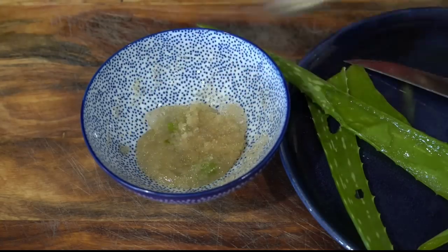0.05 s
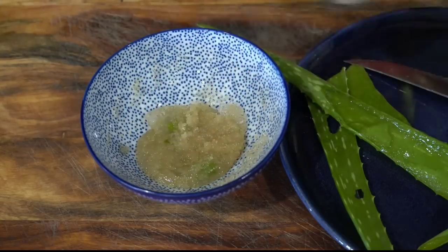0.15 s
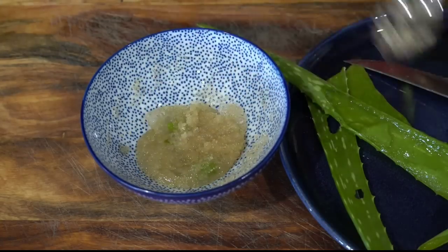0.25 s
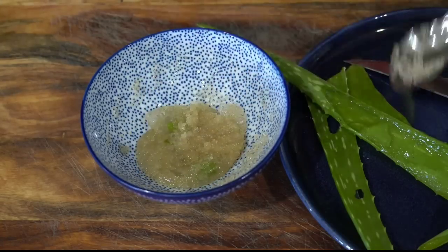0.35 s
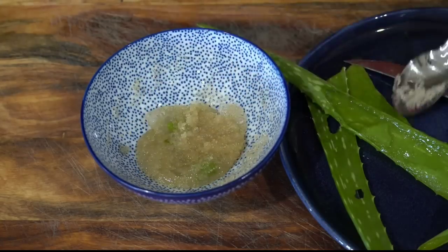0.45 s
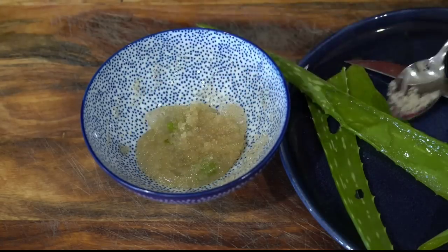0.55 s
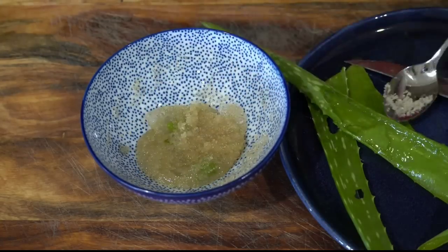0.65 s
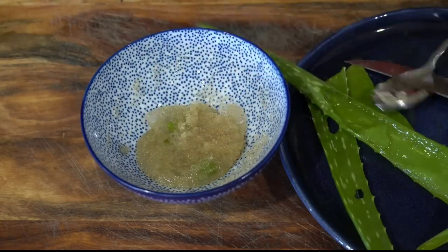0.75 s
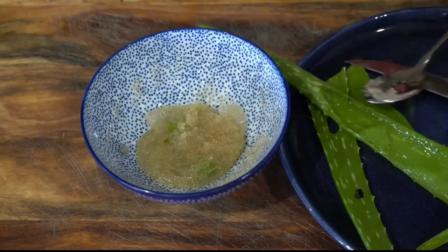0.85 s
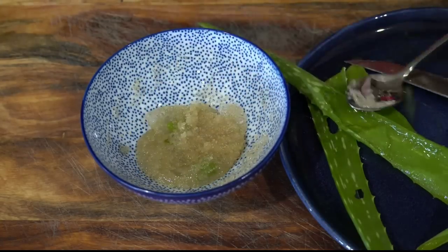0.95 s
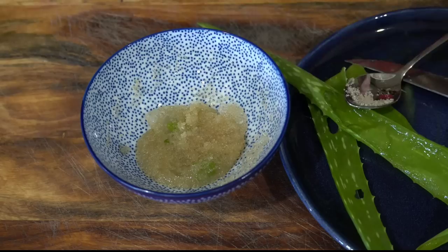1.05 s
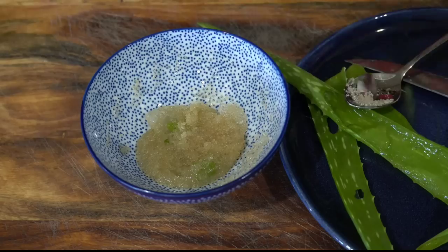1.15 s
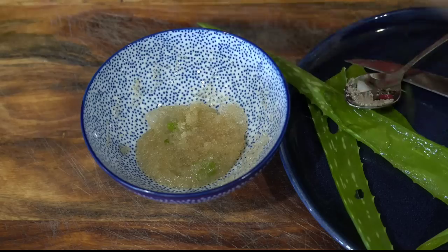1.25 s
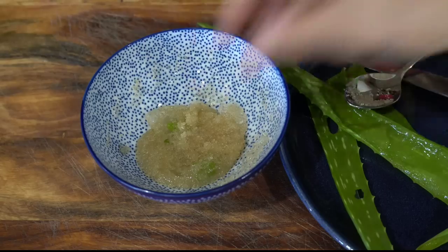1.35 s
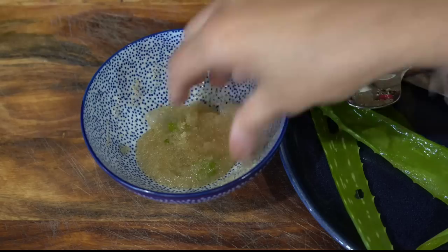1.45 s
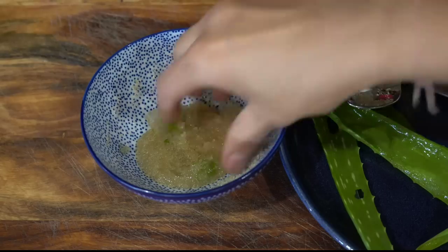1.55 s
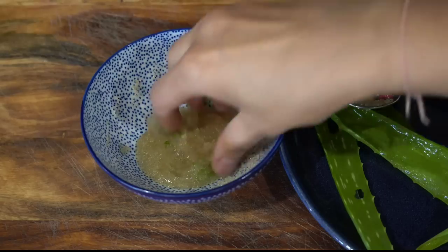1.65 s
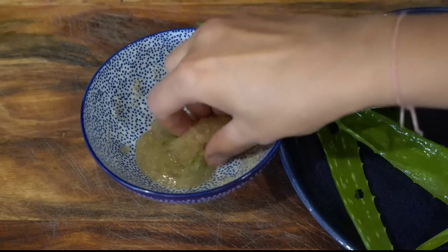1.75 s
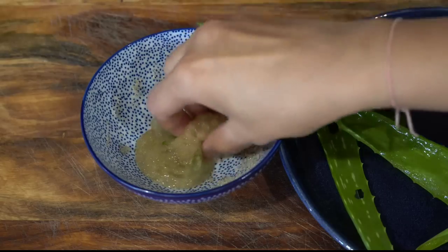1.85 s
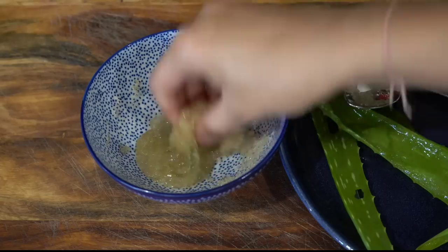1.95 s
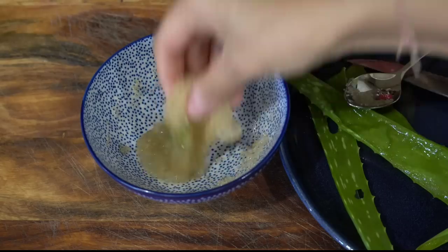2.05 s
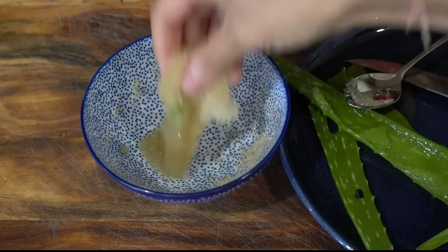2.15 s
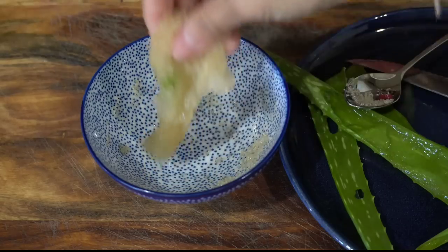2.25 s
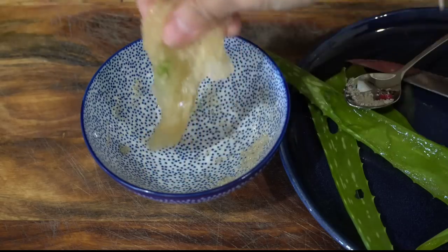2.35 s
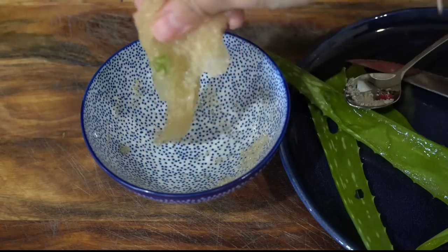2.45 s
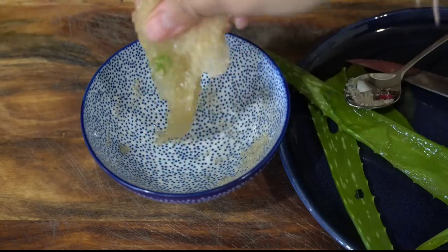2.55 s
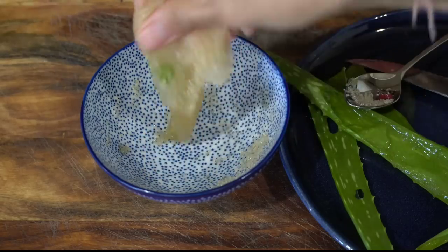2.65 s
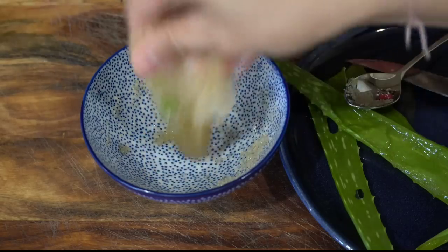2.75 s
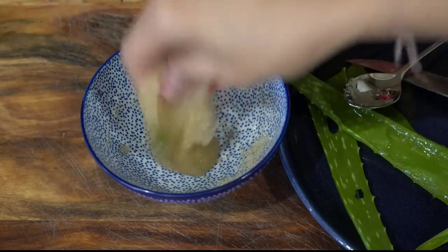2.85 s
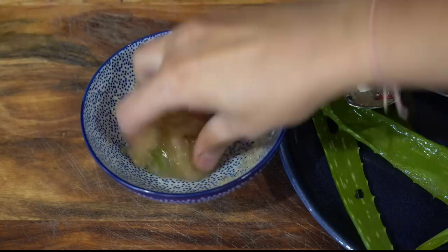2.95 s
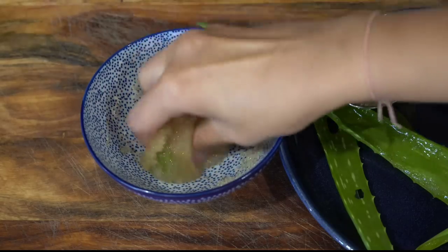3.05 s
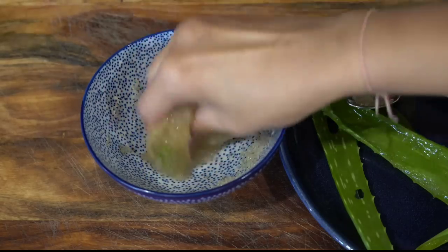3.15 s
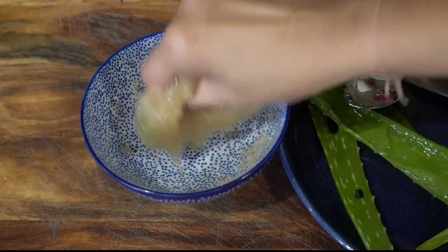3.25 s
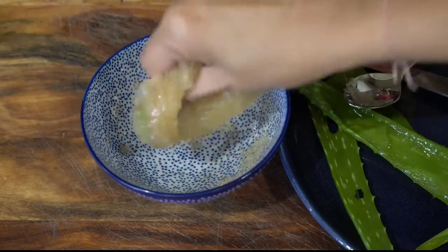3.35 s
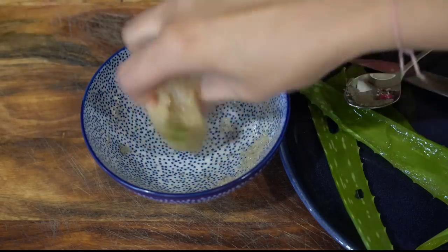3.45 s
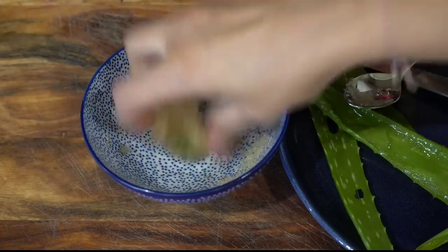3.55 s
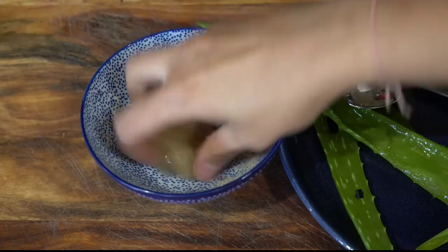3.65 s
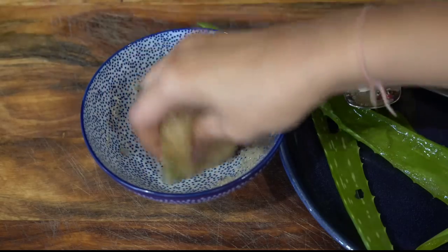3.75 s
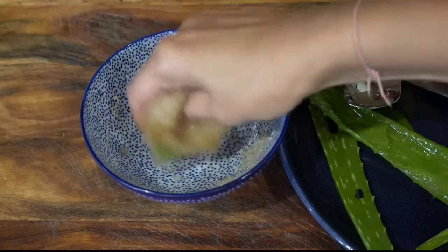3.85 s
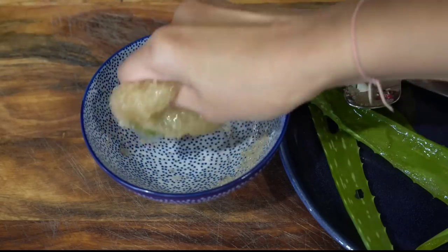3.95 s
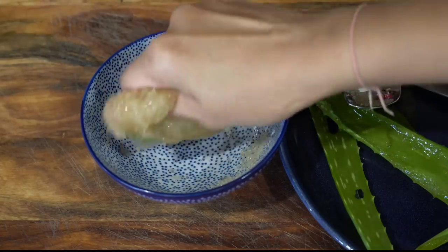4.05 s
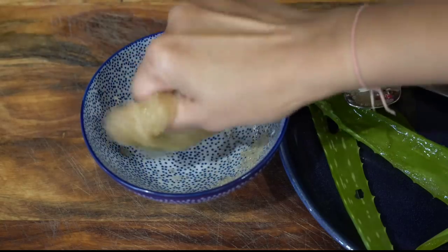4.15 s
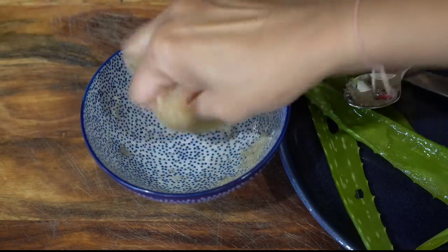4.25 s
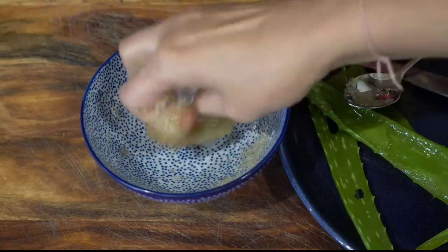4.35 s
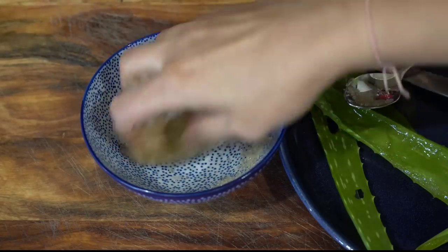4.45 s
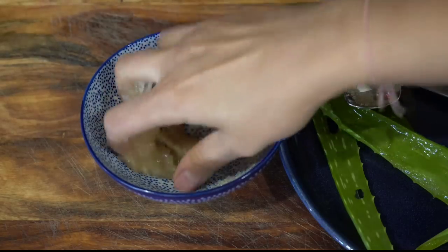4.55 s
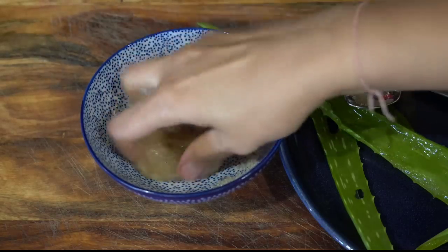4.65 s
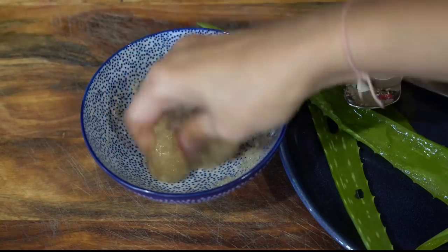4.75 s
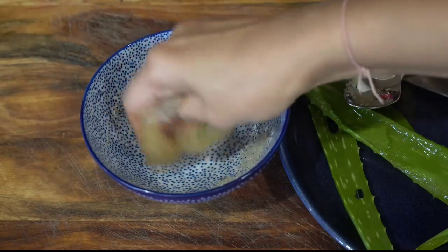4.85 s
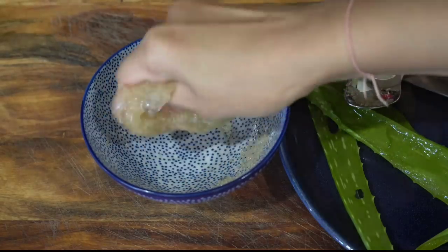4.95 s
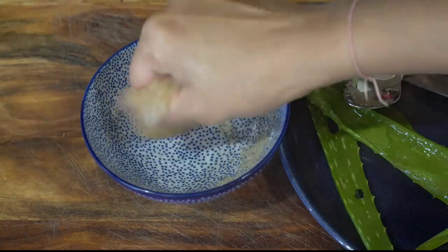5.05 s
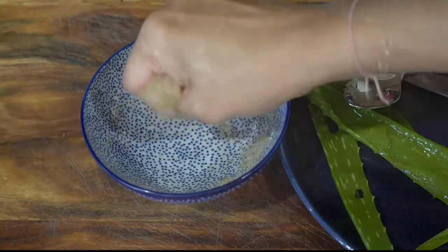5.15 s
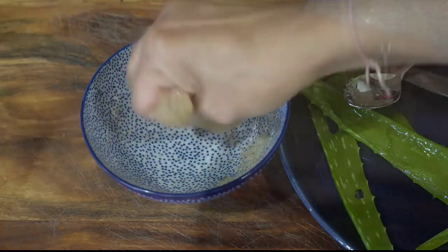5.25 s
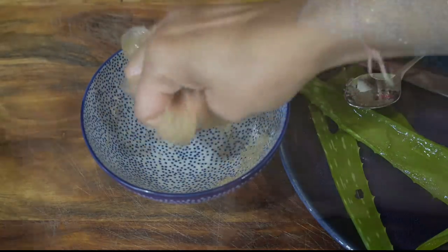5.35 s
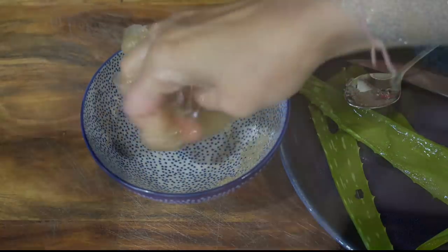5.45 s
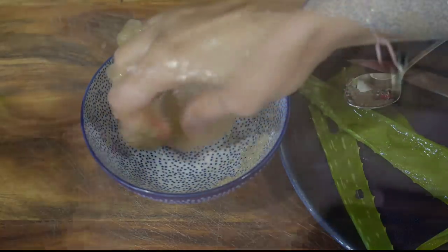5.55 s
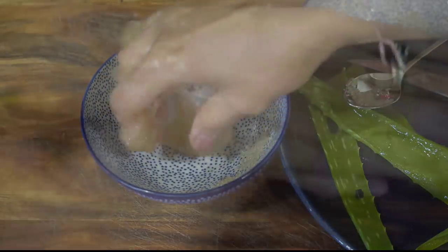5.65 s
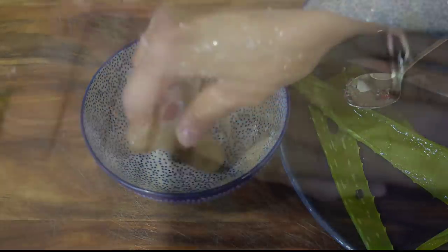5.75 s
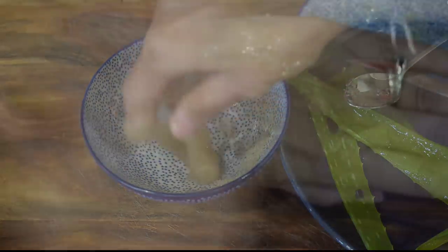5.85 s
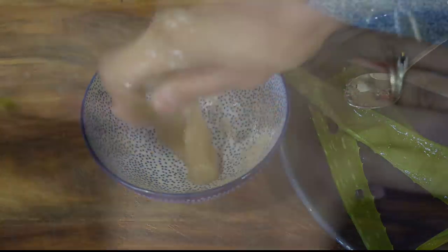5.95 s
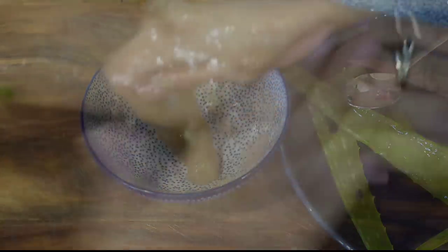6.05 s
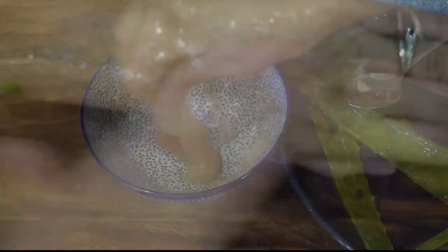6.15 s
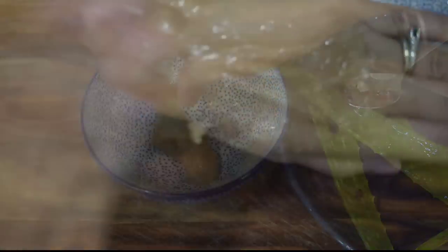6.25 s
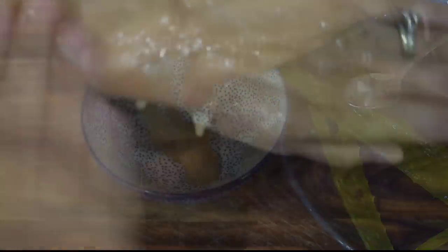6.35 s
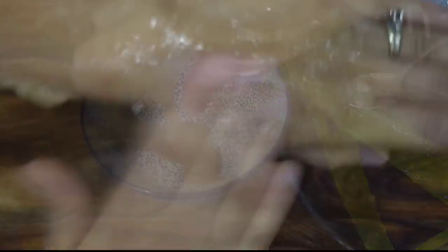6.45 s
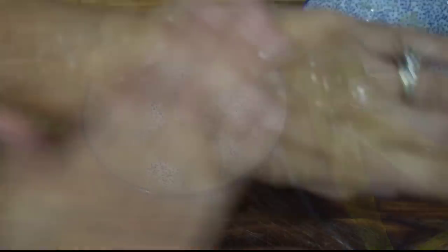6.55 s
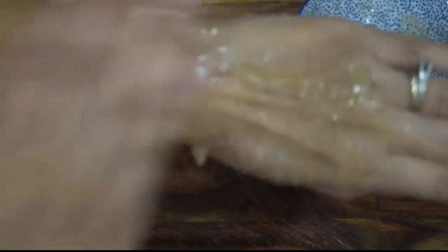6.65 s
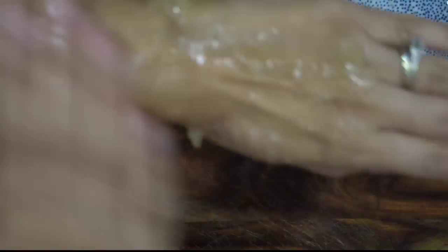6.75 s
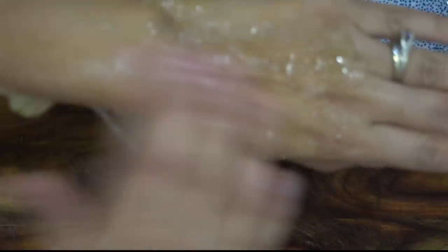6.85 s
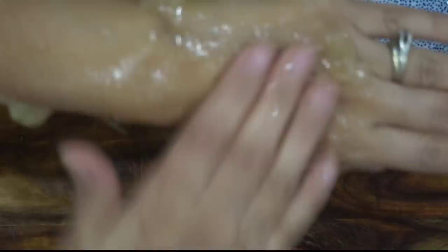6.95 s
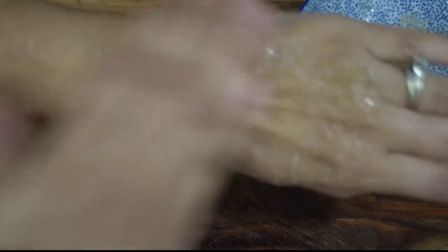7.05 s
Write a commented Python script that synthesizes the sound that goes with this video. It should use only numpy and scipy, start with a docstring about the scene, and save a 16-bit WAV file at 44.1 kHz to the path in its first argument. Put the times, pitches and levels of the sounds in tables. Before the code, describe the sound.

A faint low drone hums in a hard-walled kitchen. At about 0.5 seconds a steel spoon meets a plate slightly to the right with a dull knock and a bright clink, taps lightly, then chatters to rest around 1 second. From 1.7 seconds a hand kneads wet sugar paste in a ceramic bowl, close by: quiet, irregular squeezes squelch, crunch and fizz, dotted with small ticks and sharp sticky smacks. The bowl knocks on its wooden board at 3.6 seconds and more softly around 4.5. The sharpest smacks come at 4, 4.9 and 5.4 seconds. Near 5.8 seconds the drone and hiss abruptly step up, a short knock follows, and the hand rubs the paste on skin in gritty, fizzy strokes with a few wet pops until the end, just after 7 seconds. A short room echo follows the clinks, knocks and smacks.

```python
"""A low drone hums in a hard-walled kitchen. Half a second in, a steel spoon is laid on a plate to the
right with a dull knock, rings, and chatters to rest. From 1.7 s a hand kneads wet sugar paste in a bowl:
slipping grains squelch, crunch and fizz, sticky films smack, and the bowl knocks and rocks on its board.
Near 5.8 s the drone and hiss step up, and the hand rubs the paste on skin in fizzy strokes.
The walls answer the spoon, the knocks and the smacks."""
import sys
import numpy as np
from scipy import signal
from scipy.fft import rfft, irfft, next_fast_len
from scipy.io import wavfile
from scipy.ndimage import uniform_filter1d, map_coordinates

SR = 44100
rng = np.random.default_rng(int(sys.argv[2]) if len(sys.argv) > 2 else 0)


def inscribe(sig):
    """Save sig as 16-bit PCM at rate SR to the path in sys.argv[1].

    A 1-D sig is mono; a 2-D sig holds one channel per row.
    Samples are clipped to [-1, 1] before scaling.
    """
    pcm = np.round(np.clip(np.atleast_2d(sig).T, -1, 1) * 32767)
    wavfile.write(sys.argv[1], SR, pcm.astype(np.int16))


N = 313551

# ringing modes of spoon and plate: pitch_hz
STEEL_MODES_HZ = [1005, 1206, 1640, 2385, 2557, 2772, 3015, 3833, 3992, 4495, 4887, 5211, 5350, 5782, 6503,
                  7327, 7655, 8726, 9640, 10200, 10800, 11650, 13070, 13750]
# sticky paste letting go: start_s, level_db, pan_db (left minus right), pop_hz, low_pop_hz, low_pop_db
LOUD_SMACKS = [(2.0325, -38.5, 2, 14200, 2240, -21), (2.001, -39, -1, 14800, 1560, -16),
               (2.1024, -45, -9, 9800, 2090, -13), (2.074, -37, -4, 11500, 1800, -23),
               (2.339, -37.5, -3, 9780, 2990, -3), (2.453, -31, -4, 14200, 3700, -4),
               (2.43, -36, -2, 12000, 3010, -12), (2.484, -30.5, -11, 12800, 4000, -14),
               (2.6087, -42, -2, 4730, 3720, 3), (2.6875, -30, -6, 9700, 2220, -20),
               (3.0757, -34.5, 4, 5100, 2270, -16), (3.4354, -42, -4, 5200, 2330, 4),
               (3.602, -37.5, -1, 8000, 2230, 21), (3.803, -30.5, 0, 4460, 2020, 1),
               (3.8639, -42, -6, 4840, 2200, 6), (3.9121, -37.5, 1, 9420, 2300, 8),
               (3.9408, -35.5, -2, 8900, 2660, -6), (4.002, -23, -3, 5530, 3350, -14),
               (4.7994, -36, 0, 4600, 1520, 6), (4.8908, -17.5, 2.5, 5540, 3780, 1),
               (4.978, -34.5, .5, 6060, 2180, 1.5), (5.1006, -40, 0, 14300, 1590, -2),
               (5.1254, -33.5, 0, 11400, 1480, -5), (5.2392, -38, -3, 5800, 2180, 10.5),
               (5.378, -25.5, 2.5, 5930, 2440, 0.5), (5.9184, -31, 1, 4310, 2090, 10),
               (6.223, -40, -6, 11200, 1540, -10), (6.3441, -31, -1, 8950, 2540, -11),
               (6.648, -36, 0, 4100, 2720, 6.5), (7.026, -38.5, -7, 5260, 3000, -4)]


def amp(db):
    return 10 ** (np.asarray(db) / 20)


def unit(x):
    return x / np.sqrt(np.mean(x ** 2) + 1e-20)


def along(points, hz):
    """Reads a curve of (Hz, value) points on a log frequency axis."""
    freqs, values = np.transpose(points)
    return np.interp(np.log(hz + 1), np.log(freqs + 1), values)


def filtered(x, response):
    """Shapes x with a complex frequency response."""
    size = next_fast_len(x.shape[-1] + 2048)
    return irfft(rfft(x, size) * response(np.fft.rfftfreq(size, 1 / SR)), size)[..., :x.shape[-1]]


def resonance(f, hz, width):
    """Response of one resonator centred on hz."""
    return 1j * f * width / (hz * hz - f * f + 1j * f * width)


def spectrum(points):
    """Turns (Hz, dB) points into a frequency response."""
    return lambda hz: amp(along(points, hz))


def rush(colour, likeness, patchy_db, grain=1):
    """Stereo noise of rms 1, flickering in brief, wide-band patches and roughened by a grain envelope."""
    bins = signal.stft(rng.standard_normal((2, N)), nperseg=256)[2]
    patches = uniform_filter1d(rng.standard_normal(bins.shape[1:]), size=12, axis=0)
    patches = uniform_filter1d(patches, size=5, axis=1)
    pair = grain * signal.istft(bins * amp(patchy_db * unit(patches)), nperseg=256)[1][:, :N]
    spread = lambda hz: np.arccos(np.clip(along(likeness, hz), -1, 1)) / 2
    mid, side = filtered(pair, lambda hz: colour(hz) * [np.cos(spread(hz)), np.sin(spread(hz))])
    return unit(np.array([mid + side, mid - side]))


def kitchen_reverb(x):
    """The walls' answer: the treble dies sooner and spreads wider than the bass."""
    # decay of the room: frequency_hz, t60_s
    decay = [(300, 0.77), (2000, 0.49), (6000, 0.51), (15000, 0.32)]
    hz, t = np.fft.rfftfreq(256, 1 / SR), np.arange(160) * 128 / SR
    shape = (2, len(hz), len(t))
    mid, side = rng.standard_normal(shape) + 1j * rng.standard_normal(shape)
    width = np.clip(hz / 2500, .2, 1)[:, None]
    echoes = np.array([mid + width * side, mid - width * side]) / np.sqrt(1 + width ** 2)
    tail = signal.istft(echoes * amp(-60 * t / along(decay, hz)[:, None]), SR, nperseg=256)[1]
    tail *= np.minimum(np.arange(tail.shape[1]) / (0.004 * SR), 1)  # echoes build up
    return signal.fftconvolve(x[None], tail / np.linalg.norm(tail[0]), axes=1)


def place(out, start_s, sound, pan_db, wet_db, low_cut_hz=194):
    """Pans one sound into the mix with its own room tail; a low cut thins the bass of each sound."""
    sound = filtered(sound, lambda f: (1j * f / (1j * f + low_cut_hz)) ** 2)
    stereo = amp(wet_db) * kitchen_reverb(sound) * amp([[pan_db / 4], [-pan_db / 4]])
    stereo[:, :len(sound)] += sound * amp([[pan_db / 2], [-pan_db / 2]])
    out[:, round(start_s * SR):][:, :stereo.shape[1]] += stereo


def room_tone(step_s=5.845, early_hiss_db=-71.5, late_hiss_db=-59.5):
    """A broad low drone and a faint hiss, both abruptly fuller from 5.85 s on."""
    # swell of the drone: time_s, level_db
    swell = [(0, -62.5), (.45, -63.5), (1.1, -69.5), (1.3, -69), (1.6, -63.5), (2.2, -68.5), (3, -65.5),
             (3.4, -67), (3.75, -64.5), (4.4, -65), (5.3, -63.5), (5.84, -70.5), (5.85, -55.5),
             (6.1, -57.5), (7.11, -57.5)]
    # colours of the early drone, the late drone and the hiss: frequency_hz, density_db
    early_colour = [(15, -80), (25, -80), (92, -17.5), (151, -21), (391, -1), (695, -6), (849, -5.5),
                    (1040, -3.5), (1180, -9.5), (1410, -7.5), (1840, -14), (2250, -7.5), (2690, -13),
                    (3140, -23), (5000, -49), (6500, -74), (11000, -120)]
    late_colour = [(15, -71), (25, -59), (92, -16), (171, -20.5), (253, -6.5), (391, -1), (434, -2.5),
                   (774, -5), (1630, -12.5), (3500, -18), (4550, -57), (7700, -120)]
    hiss_colour = [(1760, -17), (3000, -3), (3830, 0), (5420, -3.5), (8750, -5.5), (15800, -8.5)]
    # stereo image of the room: frequency_hz, left_right_correlation
    likeness = [(60, 0.65), (240, 0.99), (950, 0.39), (3770, 0.044), (15000, 0.1)]
    t = np.arange(N) / SR
    early = rush(spectrum(early_colour), likeness, patchy_db=0.43)
    late = rush(spectrum(late_colour), likeness, patchy_db=0.04)
    hiss = rush(spectrum(hiss_colour), likeness, patchy_db=0.5)
    drone = amp(np.interp(t, *np.transpose(swell))) * np.where(t < step_s, early, late)
    return drone + amp(np.where(t < step_s, early_hiss_db, late_hiss_db)) * hiss


def spoon_contacts(bounces, drop_s=0.95, gap_s=0.0091, loss_db=0.77):
    """Light taps excite few modes; let go, the spoon bounces on chance spots and rings in all of them."""
    # taps and scrapes: start_s, level_db, pan_db, first_hz, second_hz, clatter_db, free_ms, rise_ms
    taps = [(.469, -21.5, -8, 3950, 2557, -4, 13, 1.7), (.516, -32, -4, 4850, 4887, 5, 36, 5.9),
            (.546, -37, -1, 4260, 2772, -8, 17, 5.2), (0.641, -44.5, -7, 2720, 2772, -32, 65, 2),
            (.725, -55.5, -19, 3880, 3970, -13, 11, 2.6), (0.749, -45, 3, 1005, 1005, -19, 20, .33),
            (.78, -43.5, -8, 5160, 5160, 9, 24, .43), (.851, -48.5, -9, 2465, 2484, -26, 48, 6.9),
            (0.866, -40.5, -7, 3920, 5940, -8, 4.8, 0.34), (.887, -43, -9, 5974, 2385, -17, 10, 27.5),
            (0.898, -33.5, -14, 5360, 11070, -31, 27, 15)]
    tap_others_db, bounce_others_db = -34, -2  # modes the contact does not favour
    contacts = [(*tap, tap_others_db) for tap in taps]
    clatter_db, free_ms, rise_ms = -11, 12, 0.55
    for k, chance in enumerate(rng.random((bounces, 3))):
        favoured_hz = np.array(STEEL_MODES_HZ)[(7 + chance[:2] * 12).astype(int)]
        level_db = -22.5 - k * loss_db
        pan_db = -6 + 8 * (chance[2] - .5)
        contacts.append((drop_s + k * gap_s, level_db, pan_db, *favoured_hz,
                         clatter_db, free_ms, rise_ms, bounce_others_db))
    return contacts


def spoon():
    """Each contact favours modes near two pitches; the next touch of finger or plate chokes the ring."""
    # spoon on plate, one row per pitch of STEEL_MODES_HZ: level_db, t60_s
    modes = [(-12.5, 0.068), (-9.5, 0.088), (-15, 0.12), (-17, 0.49), (-4.5, 0.026), (-10.5, 0.079),
             (-5.5, .15), (0.5, 0.079), (2.5, 0.14), (-6, 0.12), (5, 0.044), (-11, 0.16), (-3, 0.049),
             (1.5, 0.17), (1.5, 0.05), (-7, 0.1), (2, 0.15), (-6.5, 0.22), (-1, 0.17), (-3, 0.15),
             (-11.5, 0.16), (3.5, 0.29), (-27, .15), (2, 0.18)]
    out, t = np.zeros((2, N + SR)), np.arange(SR // 5) / SR
    hz, (mode_db, t60) = np.array(STEEL_MODES_HZ), np.transpose(modes)
    for contact in spoon_contacts(bounces=5):
        start_s, level_db, pan_db, *favoured_hz, clatter_db, free_ms, rise_ms, others_db = contact
        favour = sum(np.exp(-(np.log(hz / centre) / .025) ** 2) for centre in favoured_hz)
        others = amp(others_db) * np.minimum(1, 6000 / hz)
        gains = amp(mode_db + rng.normal(0, 1.5, len(hz))) * (favour + others)
        blur = .03 * (1 + 0.082 * rise_ms)  # a slow, scraping contact blurs the pitches more
        rattle = blur * np.cumsum(rng.standard_normal((len(t), len(hz))), axis=0)
        ring = (gains * amp(-60 * t[:, None] / t60) * np.sin(2 * np.pi * hz * t[:, None] + rattle)).sum(1)
        noise = rng.standard_normal(len(t))
        noise = filtered(noise, lambda f: resonance(f, 1900, 4200) * resonance(f, 2500, 18000))
        clatter = np.linalg.norm(gains) * amp(clatter_db - 60 * t / 0.069) * noise
        choke = amp(-24.5) + np.exp(-(t * 1000 / free_ms) ** 4)
        attack = 1 - np.exp(-(t * 1000 / rise_ms) ** 2)
        clink = (ring + clatter) * choke * attack
        place(out, start_s, amp(level_db) * clink / abs(clink).max(), pan_db, wet_db=0.5)
    return out[:, :N]


def knocks():
    """Bowl and crockery knock: a damped note and a woody clack from the board below."""
    # dull knocks: start_s, level_db, pitch_hz, t60_s, clack_db
    hits = [(.469, -39.5, 1000, 0.079, -3), (0.751, -55, 723, 0.13, 3), (3.471, -53, 1450, 0.044, -14),
            (3.565, -57.5, 640, 0.22, 1), (3.616, -33.5, 864, 0.08, 3), (3.625, -37.5, 985, 0.053, 1),
            (3.641, -42, 624, 0.078, 2), (3.68, -51, 720, 0.085, -10), (3.755, -47, 2150, 0.067, -23),
            (4.535, -56, 3130, 0.22, -23), (4.555, -49.5, 1650, 0.26, 4.5), (4.789, -52, 1522, 0.22, -14),
            (5.916, -33.5, 1840, 0.017, -7.5)]
    out, t = np.zeros((2, N + SR)), np.arange(SR // 3) / SR
    board = lambda f: (resonance(f, 660, 560) - 0.44 * resonance(f, 1700, 630)
                       + 0.14 * resonance(f, 1900, 570)) * resonance(f, 930, 2700)
    for start_s, level_db, hz, t60, clack_db in hits:
        note = amp(-60 * t / t60) * np.sin(2 * np.pi * hz * t)
        push = (amp(-60 * t / 0.2) + 3 * amp(-60 * t / 0.0069)) * rng.standard_normal(len(t))
        clack = filtered(push, board)
        knock = note + amp(clack_db) * clack / abs(clack).max()
        place(out, start_s, amp(level_db) * knock, pan_db=-.8, wet_db=-6)
    return out[:, :N]


def kneading():
    """Squelch, crunch and fizz gains and the air pocket's pitch: each squeeze rises, sags, lets go."""
    # squeezes of the fist, then strokes on skin:
    # start_s, hold_s, crunch_db, squelch_over_crunch_db, fizz_over_crunch_db, pocket_hz
    squeezes = [(1.743, 0.26, -63.5, -4, 0, 2290), (2.074, 0.17, -67, -10, 6.5, 2430),
                (2.28, 0.067, -60.5, -3.5, 4.5, 2600), (2.423, 0.0072, -57.5, -4.5, 2, 2520),
                (2.511, 0.059, -50.5, -3.5, 2.1, 2340), (2.621, 0.051, -49, -6, -5.5, 2950),
                (2.768, 0.076, -59, -12, 1, 2540), (2.954, 0.1, -60, -10, 4, 2300),
                (3.072, 0.04, -49.5, -5.5, -2, 2390), (3.166, 0.13, -55, 5, 0, 2040),
                (3.42, 0.047, -58, -5.5, 0, 2340), (3.566, 0.056, -59, -3.5, 1.8, 1500),
                (3.678, 0.098, -55.5, -3, 1.2, 1760), (3.817, 0.14, -54, 0.8, -1, 1900),
                (3.993, 0.12, -58, -3, 1.5, 2260), (4.204, .06, -65, -2, 4, 2180),
                (4.278, 0.17, -61, -2, 2, 2400), (4.534, 0.074, -64, 5, 2.5, 1810),
                (4.663, 0.075, -55.5, -3.5, -1.5, 1800), (4.768, 0.1, -58, 4.5, -3.5, 1810),
                (4.952, 0.025, -56, -4.5, 2, 2490), (5.115, 0.067, -64, 0, -0.5, 1800),
                (5.24, 0.027, -64, -3, -2, 2330), (5.286, 0.075, -64.5, -5, 5.5, 2600),
                (5.375, 0.033, -65.5, 3.5, -8, 2480), (5.878, .06, -68.5, -20, 9, 1890),
                (5.92, 0.16, -54, -1.5, 0.7, 2100), (6.152, 0.013, -54.5, -9, 2.7, 2460),
                (6.22, 0.21, -62.5, -20, 9, 1940), (6.465, 0.35, -58.5, -6.5, 4.5, 1970),
                (6.699, 0.024, -55.5, -7.5, 3.5, 2390), (6.817, 0.22, -62.5, -17, 6.5, 2100),
                (7.023, 0.094, -54, -18, -3, 2600)]
    rise_db_per_s, sag_db_per_s, release_db_per_s = 267, 29, 202
    fall_octaves_per_s = 1.8  # the pocket deepens as the fist closes
    wake_db, wake_db_per_s = -26.5, 362  # crunch left behind each loud smack
    t = np.arange(0, N / SR, .001)
    start_s, hold_s, crunch_db, squelch_db, fizz_db, hz = np.transpose(squeezes)[:, :, None]
    age = t - start_s
    ahead, held, released = (-age).clip(0), age.clip(0, hold_s), (age - hold_s).clip(0)
    shape_db = -rise_db_per_s * ahead - sag_db_per_s * held - release_db_per_s * released
    power = amp(crunch_db + shape_db) ** 2 + 1e-30
    pocket_hz = (power * hz * 2 ** (-fall_octaves_per_s * held)).sum(0) / power.sum(0)
    smack_s, smack_db = np.transpose(LOUD_SMACKS)[:2, :, None]
    wakes = (t > smack_s + .003) * amp(smack_db + wake_db - wake_db_per_s * abs(t - smack_s))
    gains = [np.sqrt((power * amp(2 * over_db)).sum(0) + (wakes ** 2).sum(0) * amp(2 * wake_trim_db))
             for over_db, wake_trim_db in ((squelch_db, -5), (0, 0), (fizz_db, -8))]
    return [np.interp(np.arange(N) / SR, t, curve) for curve in gains + [pocket_hz]]


def slips(spacing_ms):
    """Stick-slip bursts: mostly small, now and then large."""
    position = np.arange(N) / (SR * spacing_ms / 1000)
    return map_coordinates(rng.exponential(size=N // 20), [position], order=1)


def paste():
    """Wet grains shear in shared slips: the low part rings the bowl, the rest crackles freely."""
    # resonances of the bowl: pitch_hz, width_hz, level_db
    bowl_modes = [(1000, 160, -6), (1520, 110, 0), (2030, 130, 0), (2300, 150, 0), (2870, 220, 0)]
    # colours of the grains' crunch and fizz: frequency_hz, density_db
    crunch_colour = [(2000, -27), (3200, -5), (4800, -0.5), (6300, -2.5), (8000, -9.5), (11000, -21)]
    fizz_colour = [(4500, -35), (7000, -1), (9500, 1.5), (13000, -1), (15500, -1.5), (17000, -27)]
    # stereo image of the paste: frequency_hz, left_right_correlation
    likeness = [(60, 0.95), (240, 0.64), (950, 0.98), (3770, 0.46), (15000, 0.43)]
    squelch_gain, crunch_gain, fizz_gain, pocket_hz = kneading()
    slip, crackle = np.minimum(slips(spacing_ms=13), 2.5), slips(spacing_ms=0.64)
    shear = rush(np.ones_like, likeness, patchy_db=2.0, grain=amp(1.3 * slip + 2.06 * crackle))
    squelch = .4 * unit(filtered(shear, lambda f: resonance(f, 2200, 1800) ** 2))
    for hz, width, level_db in bowl_modes:
        favour = amp(level_db - 16 * abs(np.log2(pocket_hz / hz)))  # strongest near the pocket's pitch
        squelch += favour * unit(filtered(shear, lambda f: resonance(f, hz, width)))
    crunch = rush(spectrum(crunch_colour), likeness, patchy_db=2.5, grain=amp(1.33 * slip + 1.3 * crackle))
    fizz = rush(spectrum(fizz_colour), likeness, patchy_db=1.5, grain=amp(2.8 * slip + 1.04 * crackle))
    return squelch_gain * unit(squelch) + crunch_gain * crunch + fizz_gain * fizz


def film_snap(level_db, pop_hz, low_hz, low_db, t60_s=0.0127):
    """A film snaps: a click and a puff of noise ring the small and the large pocket of air it opens."""
    t = np.arange(SR // 20) / SR
    puff = amp(-60 * t / t60_s) * rng.standard_normal(len(t))
    puff[0] += 3.5  # the click
    pockets = lambda f: (resonance(f, pop_hz, 0.43 * pop_hz) ** 2 + 0.44 * resonance(f, 7060, 6100) ** 2
                         + amp(low_db) * resonance(f, low_hz, 0.55 * low_hz) ** 2)
    pop = filtered(puff, pockets)
    return amp(level_db) * pop / abs(pop).max()


def smacks(tick_count):
    """Paste lets go in loud smacks, and in small random ticks that grow as the hand presses harder."""
    out, ticks = np.zeros((2, N + 2 * SR)), np.zeros(N + SR // 20)
    crunch_gain = kneading()[1]
    for start_s, level_db, pan_db, pop_hz, low_hz, low_db in LOUD_SMACKS:
        place(out, start_s, film_snap(level_db, pop_hz, low_hz, low_db), pan_db, wet_db=-7.5)
    for when, smallness, high, low in rng.random((tick_count, 4)):
        i = int(when * N)
        over_crunch_db = 9 - 2 * np.log(smallness + 0.011)
        pop_hz, low_hz = 4080 * (13400 / 4080) ** high, 1480 * (3580 / 1480) ** low
        ticks[i:i + SR // 20] += crunch_gain[i] * film_snap(over_crunch_db, pop_hz, low_hz, low_db=-4)
    place(out, 0, ticks, pan_db=-1.5, wet_db=-4.5)
    return out[:, :N]


def thumps(t60_s=0.41):
    """The bowl rocks and sends a low, damped note through the board."""
    # rocks of the bowl: start_s, level_db, pitch_hz
    rocks = [(3.6, -75, 65), (4.561, -76, 127)]
    out = np.zeros(N)
    for start_s, level_db, hz in rocks:
        age = (np.arange(N) / SR - start_s).clip(0)
        out += amp(level_db - 60 * age / t60_s) * np.sin(2 * np.pi * hz * age)
    return out


def scene():
    return room_tone() + spoon() + knocks() + paste() + smacks(tick_count=200) + thumps()


def record(dry, top_hz=15800):
    """A sheer cut takes off the very top of the treble."""
    return filtered(dry, lambda hz: hz < top_hz)


dry = scene()
out = record(dry)
inscribe(out)
```